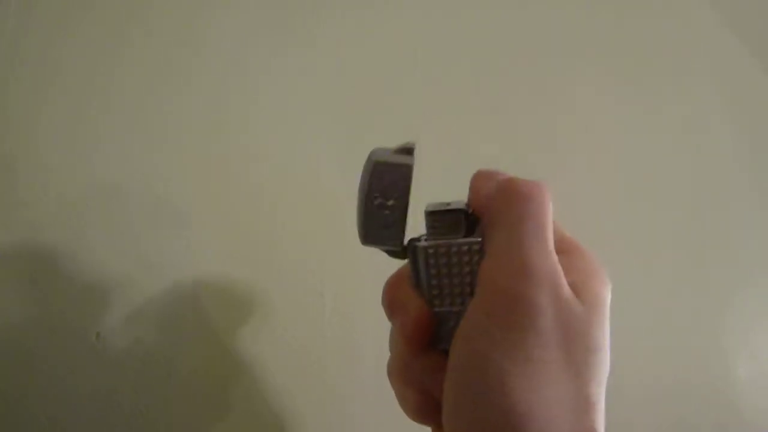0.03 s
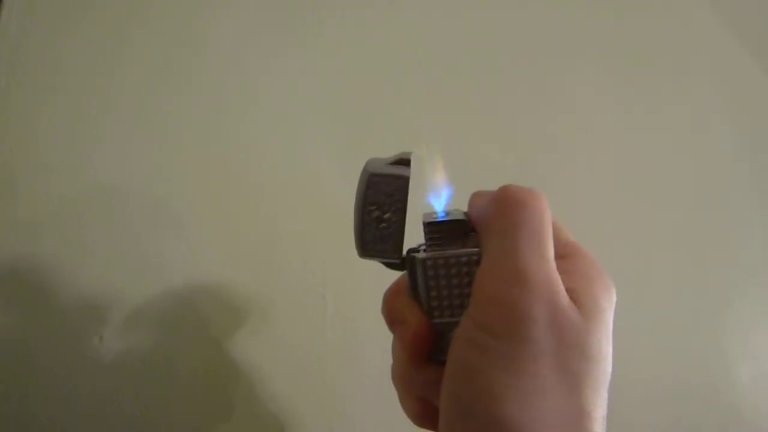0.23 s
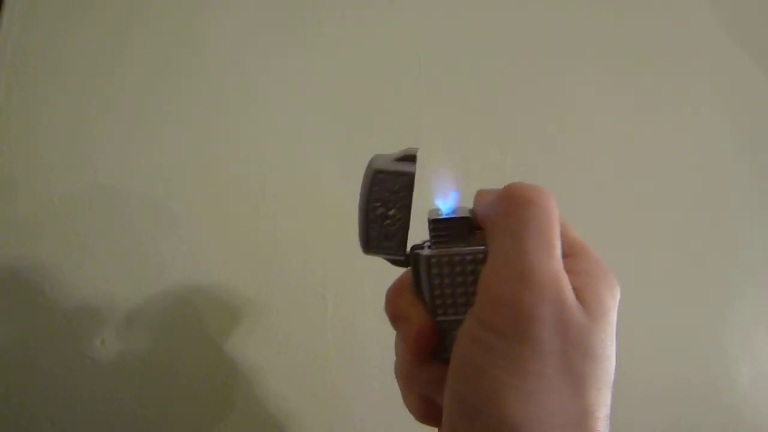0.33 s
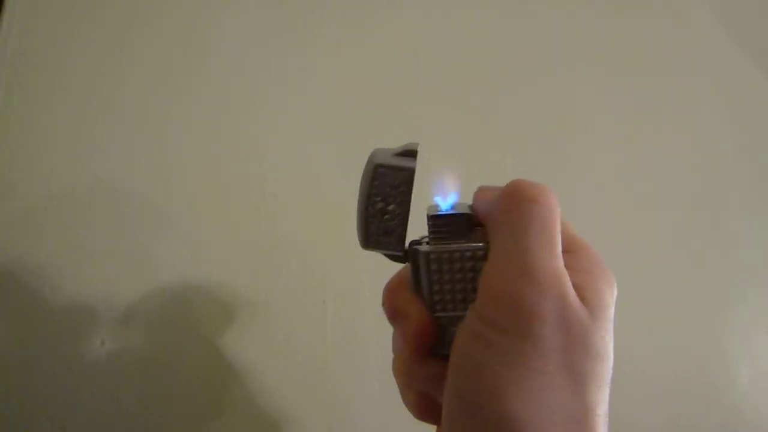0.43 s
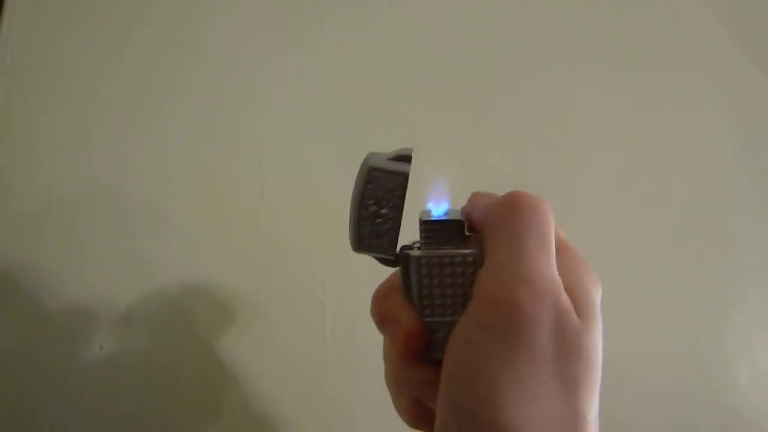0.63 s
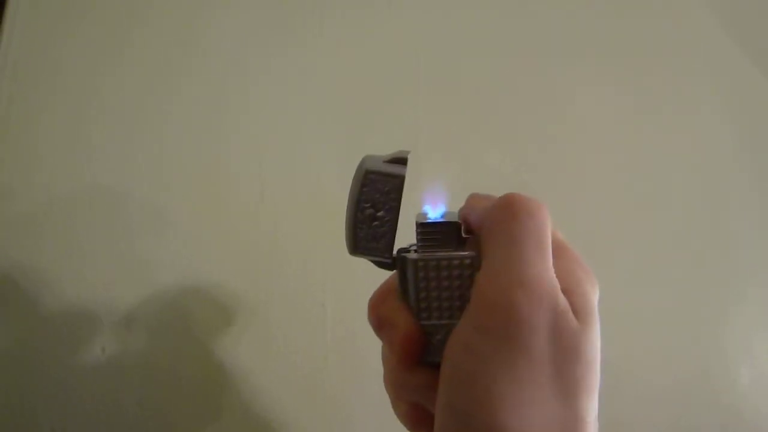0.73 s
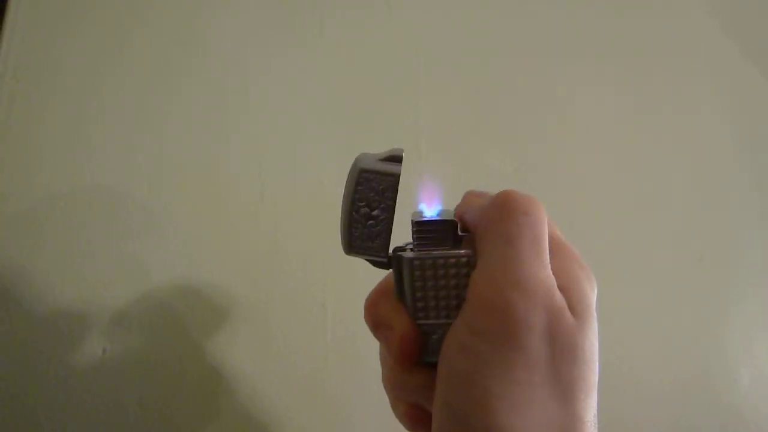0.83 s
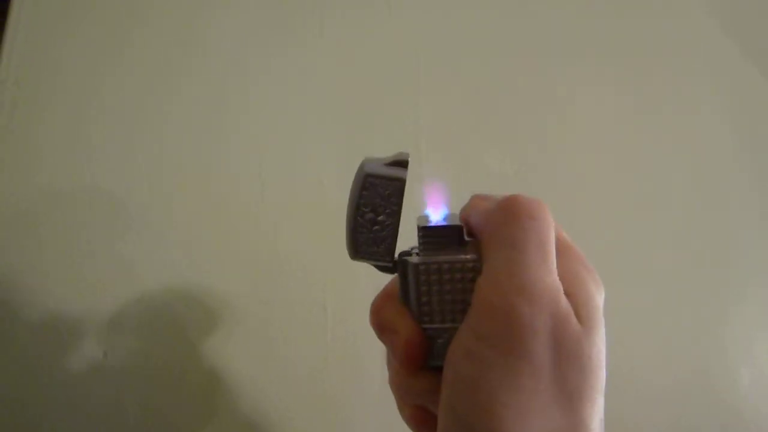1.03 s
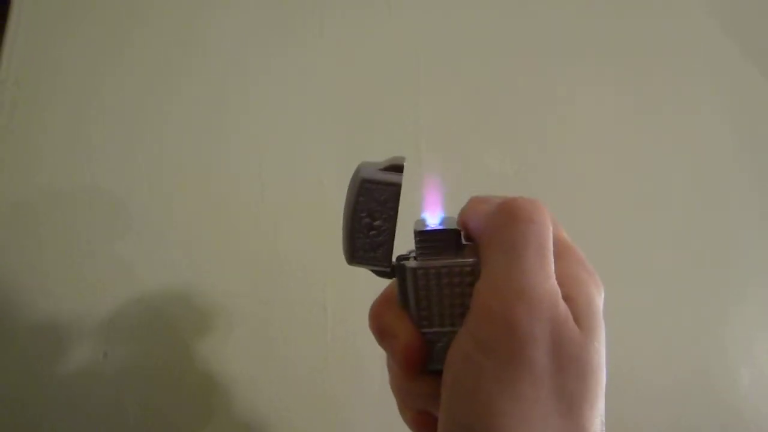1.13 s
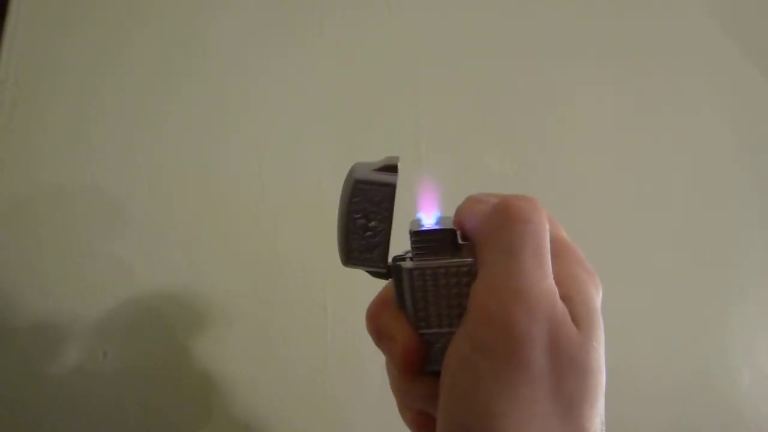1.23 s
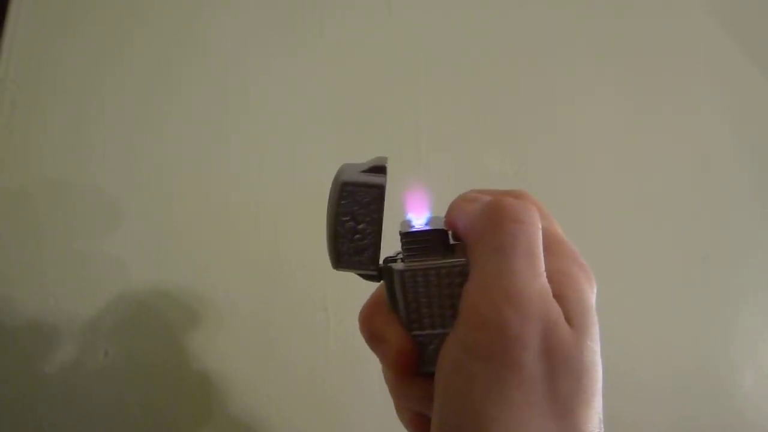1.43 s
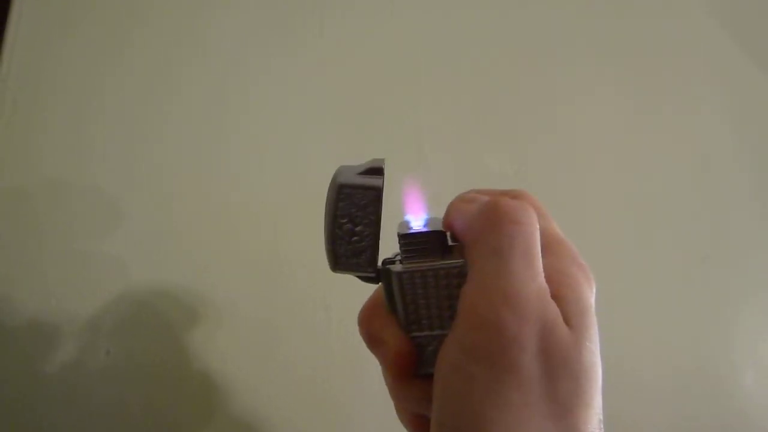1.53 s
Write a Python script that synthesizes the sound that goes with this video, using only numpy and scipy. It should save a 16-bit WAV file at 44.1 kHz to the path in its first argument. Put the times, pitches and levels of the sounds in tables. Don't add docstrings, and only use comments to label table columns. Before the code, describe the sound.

A metal jet lighter snaps sharply, then its gas flame hisses and flutters quietly in a room

```python
import sys
import numpy as np
from scipy import signal
from scipy.fft import rfft, irfft
from scipy.io import wavfile
from scipy.ndimage import uniform_filter1d

SR = 44100
rng = np.random.default_rng(int(sys.argv[2]) if len(sys.argv) > 2 else 0)


def convert_level_to_amplitude(level_db):
    exponent = np.asarray(level_db, float) / 20
    return 10 ** exponent


def to_wav(sig):
    pcm = np.clip(np.atleast_2d(sig), -1, 1) * 32767
    pcm = np.round(pcm).astype(np.int16)
    wavfile.write(sys.argv[1], SR, pcm.T)


N = 70560

# f/Hz, level/dB, t60/s
CASE_MODES = [(150, -24, 0.038), (295, -16.5, 0.024), (600, -25, 0.007), (2076, -13.5, .016),
              (2804, -17, 0.021), (2360, -20, 0.011), (3280, -8.5, 0.018), (3720, 1, 0.015),
              (3850, -12.5, .014), (4920, -15.5, 0.014), (5250, -12.5, 0.011), (5810, -25, 0.0072),
              (7030, -10, 0.006), (7800, -14.5, 0.014)]
# t/s after the strike, level/dB
HAMMER_REBOUNDS = [
    (.0048, -13),
    (.0070, -21.5),
]
# t/s, roar level/dB
BURN_STRENGTH = [(.215, -47), (.25, -40), (.29, -40), (.315, -35), (.345, -40), (.39, -38.5), (.43, -39.5),
                 (.455, -33), (.48, -40.5), (.57, -43), (.635, -44.5), (.67, -39.5), (.78, -39), (.84, -41),
                 (.87, -38), (1.05, -43.5), (1.17, -40), (1.6, -42)]
# f/Hz, level/dB per Hz
ROAR_COLOUR = [(40, -35.5), (100, -13.5), (340, -0.5), (563, -6), (876, -12), (1300, -10.5), (2100, -12),
               (2650, -22.5)]
# f/Hz, level/dB per Hz
HISS_COLOUR = [(2650, -13.5), (3500, -2), (4150, -2), (4550, -18), (5300, -20), (6250, -12.5), (7000, -22),
               (7500, -20.5)]
# f/Hz, level/dB per Hz
ECHO_COLOUR = [(800, -35.5), (2300, -20), (3100, -6), (3750, -2), (4410, -20), (6160, -20), (7130, -15),
               (8000, -23.5)]
# f/Hz, level/dB per Hz
GAS_COLOUR = [(1000, -13), (2050, -2.5), (3350, -12), (3800, 0.5), (4300, -15), (5000, -23), (6500, -4.5),
              (8000, -12.5)]
# f/Hz, level/dB per Hz
ROOM_COLOUR = [(20, -34.5), (60, -3.5), (87, -20.5), (118, -0.5), (150, -4), (240, -3.5), (500, -9),
               (1000, -15)]

STRIKE_S, STRIKE_DB = 0.19995, 1
REBOUND_DULL_DB_PER_KHZ = -2
CRACK_DB, CRACK_T60_S, CRACK_FLOOR_HZ = -5, 0.006, 1780

LIGHT_S = 0.01
EDDIES_PER_S, EDDY_SHARE = 1500, 0.26
ROAR_LIFT_DB, RUMBLE_TOP_HZ = 1.33, 800
HISS_DB = -45.5
UPPER_FOLLOWS, HISS_FOLLOWS = 0.5, 0.2
WALL_LAG_S, WALL_DB, WALL_TOP_HZ = 0.004563, -15, 2520

ECHO_DB, ECHO_T60_S = -28.5, 0.8
GAS_DB, GAS_SWELL_DB_PER_S, GAS_FADE_S = -46.5, 8, 0.05
ROOM_DB = -54
DUCK_DB, RECOVER_S, SETTLED_DB = -14.5, 0.017, -6

HALF_RATE_HZ, NOTCH_HZ, CUTOFF_HZ = 8000, 70, 16050
INPUT_TOP, CLIP_TOP, CLIP_KNEE = 0.87, 0.82, 16
IMAGE_DB, IMAGE_DB_PER_KHZ3, SLOPE_FROM_HZ = -1.5, -11, 7435

DRIFT_STEP = 40


def striker():
    out = np.zeros(N)
    span = slice(0, N // 4)
    t = since_strike()[span]
    blows = [(0, 0)] + HAMMER_REBOUNDS
    signs = rng.choice([-1, 1], (len(blows), len(CASE_MODES)))
    for (lag, blow_db), row in zip(blows, signs):
        late = np.maximum(t - lag, 0)
        for (hz, mode_db, t60), sign in zip(CASE_MODES, row):
            dull_db = (lag > 0) * REBOUND_DULL_DB_PER_KHZ * max(hz / 1000 - 4, 0)
            decay = convert_level_to_amplitude(blow_db + dull_db + mode_db - 60 * late / t60)
            out[span] += sign * decay * np.sin(2 * np.pi * hz * late)
    crack_level = (t > 0) * convert_level_to_amplitude(CRACK_DB - 60 * abs(t) / CRACK_T60_S)
    crack = crack_level * rng.standard_normal(len(t))
    out[span] += crack - low_part(crack, CRACK_FLOOR_HZ)
    return convert_level_to_amplitude(STRIKE_DB) * out


def burning_gas():
    burst_size = convert_level_to_amplitude(4.6 * np.minimum(rng.exponential(1, N), 4))
    eddies = (rng.random(N) < EDDIES_PER_S / SR) * burst_size * rng.choice([-1, 1], N)
    bed = rng.standard_normal(N)
    return np.sqrt(EDDY_SHARE) * rms_one(eddies) + np.sqrt(1 - EDDY_SHARE) * bed


def near_wall(x):
    return x - convert_level_to_amplitude(WALL_DB) * np.roll(low_part(x, WALL_TOP_HZ), int(WALL_LAG_S * SR))


def flame():
    s, db = np.transpose(BURN_STRENGTH)
    usual_db = np.median(db)
    surge_db = np.interp(np.arange(N) / SR, s, db) - usual_db
    source = burning_gas()

    roar = turbulence(ROAR_COLOUR, patchy_db=0.7, source=source, stops_above=True)
    roar = near_wall(convert_level_to_amplitude(usual_db + ROAR_LIFT_DB) * roar)
    rumble = low_part(roar, RUMBLE_TOP_HZ)
    upper = roar - rumble
    roar = convert_level_to_amplitude(surge_db) * rumble + convert_level_to_amplitude(UPPER_FOLLOWS * surge_db) * upper

    hiss_db = HISS_DB + HISS_FOLLOWS * uniform_filter1d(surge_db, size=2000)
    hiss = convert_level_to_amplitude(hiss_db) * turbulence(HISS_COLOUR, patchy_db=0.85, source=source)
    lit = np.clip(since_strike() / LIGHT_S, 0, 1)
    return lit * (roar + hiss)


def echo():
    t = since_strike()
    level = (t > 0) * convert_level_to_amplitude(ECHO_DB - 60 * abs(t) / ECHO_T60_S)
    return level * turbulence(ECHO_COLOUR, patchy_db=1.0)


def gas():
    t = since_strike()
    swell_db = GAS_SWELL_DB_PER_S * (np.minimum(t, 0) + 0.13)
    fade_db = -20 * np.maximum(t, 0) / GAS_FADE_S
    return convert_level_to_amplitude(GAS_DB + swell_db + fade_db) * turbulence(GAS_COLOUR, patchy_db=0.9)


def room_tone():
    level_db = ROOM_DB + (since_strike() > 0) * SETTLED_DB
    return convert_level_to_amplitude(level_db) * turbulence(ROOM_COLOUR, patchy_db=2.9, stops_above=True)


def turbulence(colour, patchy_db, source=None, stops_above=False):
    hz = np.maximum(np.arange(N // 2 + 1) * SR / N, 1)
    f, level_db = np.transpose(colour)
    white = rng.standard_normal(N) if source is None else source
    above_db = -120 if stops_above else None
    colour_db = np.interp(np.log(hz), np.log(f), level_db, -120, above_db)
    coloured = rfft(white) * convert_level_to_amplitude(colour_db)
    coloured = coloured / np.sqrt(np.mean(irfft(coloured, N) ** 2))

    place = 2 * np.log2(np.clip(hz, 44, 8000) / 44)
    gains = convert_level_to_amplitude(patchy_db * (0.73 * drift(10.7, count=1) + drift(17, count=16)))
    out = 0
    for k, gain in enumerate(gains):
        band = coloured * np.clip(1 - abs(place - k), 0, 1)
        if abs(band).max() > 1e-3 * abs(coloured).max():
            flicker = np.interp(np.arange(N) / DRIFT_STEP, np.arange(len(gain)), gain)
            out = out + flicker * irfft(band, N)
    return out


def drift(rate_hz, count):
    r = np.exp(-2 * np.pi * rate_hz * DRIFT_STEP / SR)
    white = rng.standard_normal((count, N // DRIFT_STEP + 1000))
    slow = signal.lfilter([1], [1, -2 * r, r * r], white)[:, 1000:]
    return slow / slow.std(axis=1, keepdims=True)


def since_strike():
    return np.arange(N) / SR - STRIKE_S


def rms_one(x):
    return x / np.sqrt(np.mean(x ** 2) + 1e-20)


def low_part(x, top_hz):
    r = np.exp(-2 * np.pi * top_hz / SR)
    return signal.lfilter([1 - r], [1, -r], x)


def overload(x, top):
    return x / (1 + abs(x / top) ** CLIP_KNEE) ** (1 / CLIP_KNEE)


def scene():
    t = since_strike()
    duck = convert_level_to_amplitude((t > 0) * DUCK_DB * np.exp(-abs(t) / RECOVER_S))
    background = echo() + room_tone() + gas()
    mix = striker() + flame() + duck * background
    return mix[None]


def top_cut(x):
    return signal.sosfilt(signal.butter(12, 16070, fs=SR, output="sos"), x)


def record(dry):
    size = 2 * N
    hz = np.arange(N + 1) * SR / size
    half = int(round(HALF_RATE_HZ * size / SR))
    low_rate = irfft(rfft(dry, size)[:, :half + 1], 2 * half) * half / N
    spectrum = rfft(overload(low_rate, INPUT_TOP)) * N / half

    raised = np.zeros((1, N + 1), complex)
    raised[:, :half + 1] = spectrum
    raised[:, half:2 * half + 1] = np.conj(spectrum[:, ::-1]) * convert_level_to_amplitude(IMAGE_DB)
    khz_above = np.maximum(hz - SLOPE_FROM_HZ, 0) / 1000
    raised = raised * convert_level_to_amplitude(IMAGE_DB_PER_KHZ3 * khz_above ** 3)
    notch = np.tanh(abs(hz - HALF_RATE_HZ) / NOTCH_HZ) ** 2
    x = np.clip(irfft(raised * notch, size), -CLIP_TOP, CLIP_TOP)

    low_pass = signal.cheby2(10, 30, CUTOFF_HZ, fs=SR, output="sos")
    mix = signal.sosfiltfilt(low_pass, x)[:, :N]
    return top_cut(mix)


dry = scene()
out = record(dry)
to_wav(out)
```